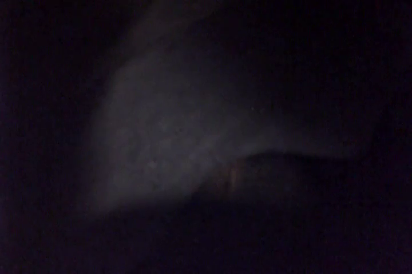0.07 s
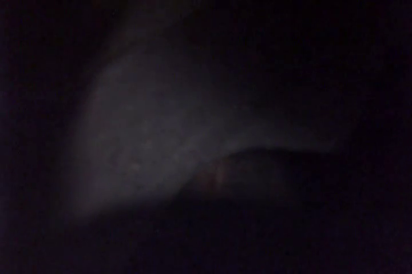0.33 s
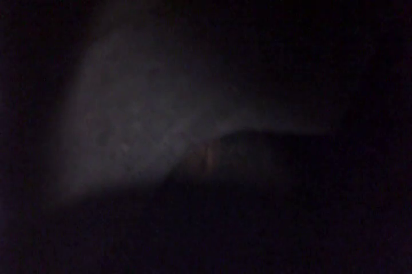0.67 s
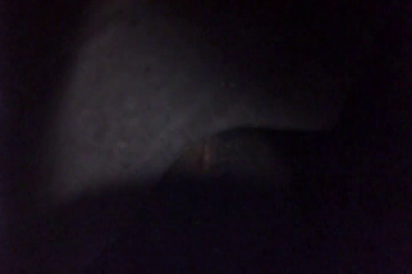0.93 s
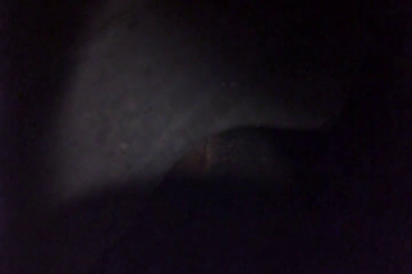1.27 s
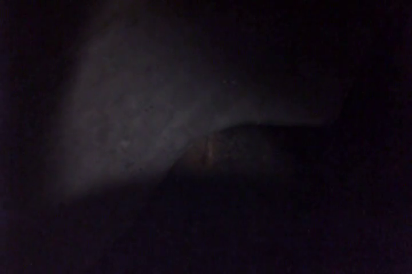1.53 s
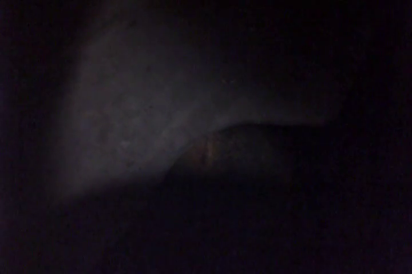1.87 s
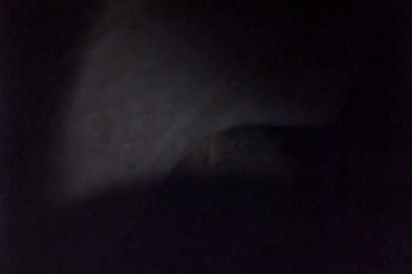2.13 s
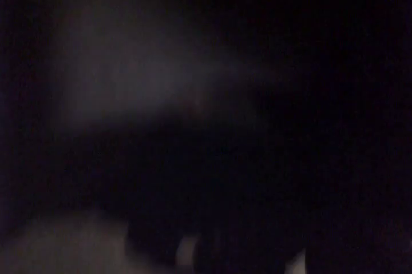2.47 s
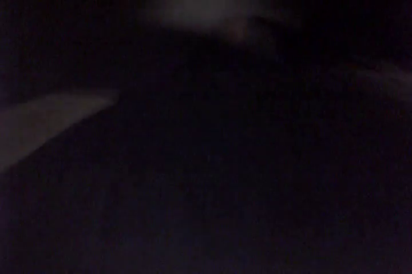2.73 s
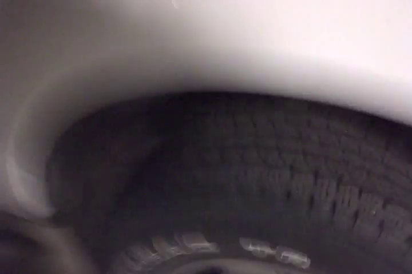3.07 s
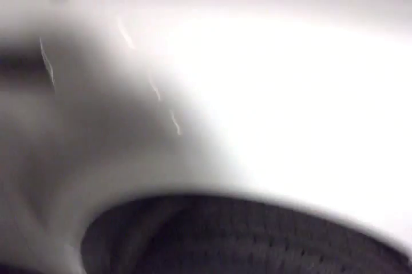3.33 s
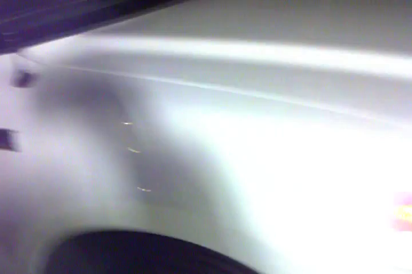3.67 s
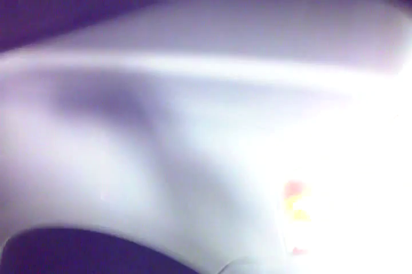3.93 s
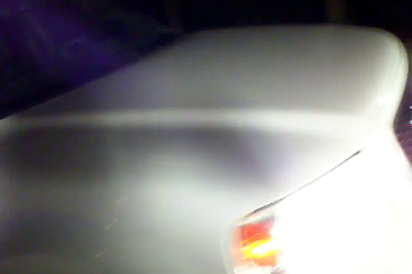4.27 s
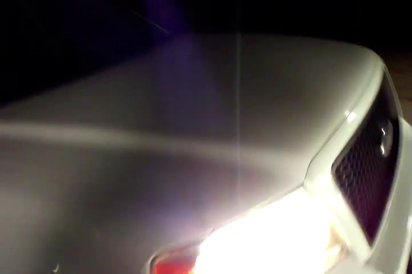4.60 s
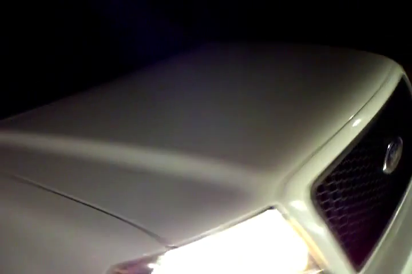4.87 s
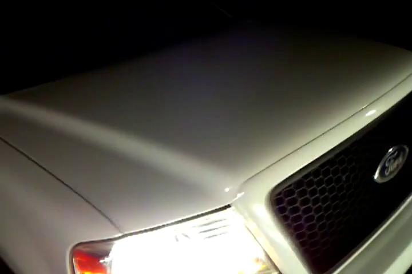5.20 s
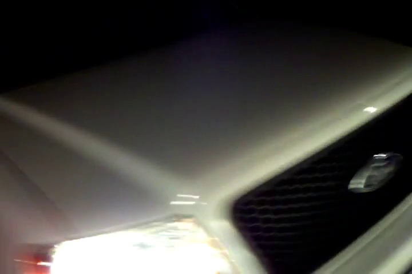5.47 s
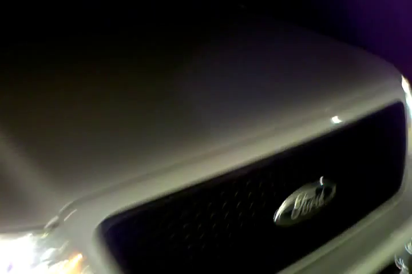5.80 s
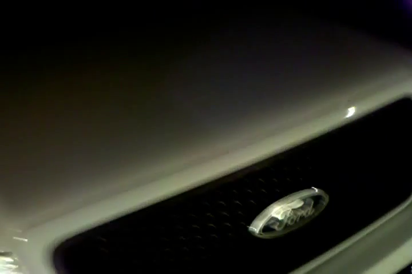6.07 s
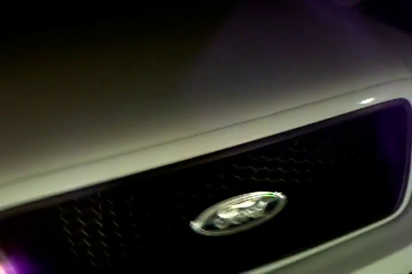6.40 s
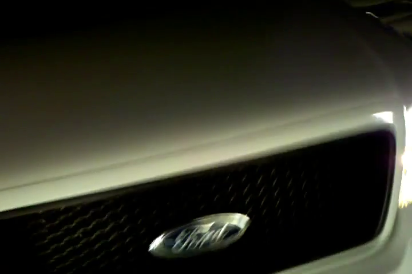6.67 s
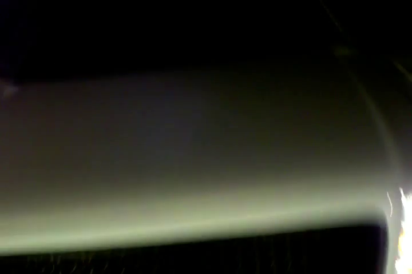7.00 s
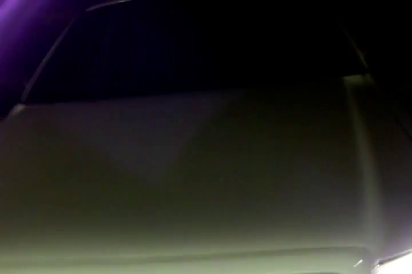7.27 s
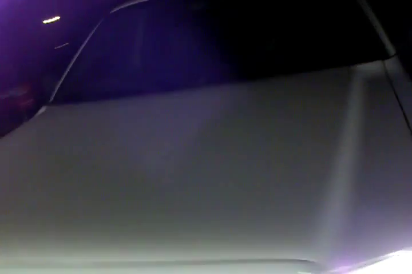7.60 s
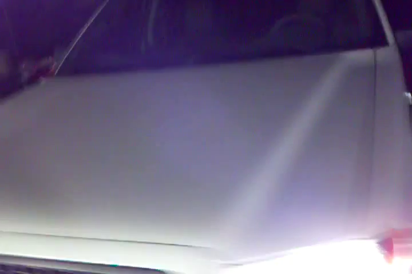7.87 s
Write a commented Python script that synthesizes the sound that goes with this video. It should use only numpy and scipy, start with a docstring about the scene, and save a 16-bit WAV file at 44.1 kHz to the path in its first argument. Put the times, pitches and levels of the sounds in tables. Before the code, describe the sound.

Fast, even ticking from a small exhaust leak, bright and spitting, stands out over the rumble of a truck idling outdoors. The close, hand-held microphone leaves the wheel arch and travels past the fender to the front, so the ticking drops into the background. The engine keeps the same speed throughout, with rough drones, fan hiss and a faint belt pulley whine, its throb slightly fuller at the grille.

```python
"""A V8 truck idles outdoors with an uneven throb throughout, along with an exhaust hum, rough drones, the
rumble of the engine block and the rush of the fan. A small exhaust leak ticks once per engine cycle
(two turns of the crank): now a soft puff, now a hard snap with a second spit. A hand-held microphone
moves from the wheel arch, where the ticks are loudest, along the fender to the grille."""
import sys
import numpy as np
from scipy import signal
from scipy.fft import rfft, irfft
from scipy.io import wavfile

SR = 44100
rng = np.random.default_rng(int(sys.argv[2]) if len(sys.argv) > 2 else 0)


def store_pcm(level_fs):
    """Save levels as 16-bit WAV."""
    pcm = np.round(np.clip(level_fs, -1, 1) * 32767).astype(np.int16)
    wavfile.write(sys.argv[1], SR, np.atleast_2d(pcm).T)


N = 358533
TIME = np.arange(N) / SR
BINS = np.fft.rfftfreq(N, 1 / SR)
CHUG_PHASE, TICK_PHASE = .935, .925  # when in a cycle (0-1) the strongest pulse and the leak come
CHUG_MULTIPLES = (26, 27, 28, 29)  # the throb tones which that pulse makes boom together

# Levels in the tables are relative: the functions scale them further.
# crank speed, wandering a little (time [s], speed [rpm])
CRANK_SPEED = [(0, 803.2), (0.6, 805.7), (1.0, 812.3), (1.3, 809.6), (2.2, 811.9), (2.65, 806.3),
               (3.05, 800.1), (3.5, 807.5), (4.3, 808.4), (4.95, 803.2), (5.6, 810.7), (6.3, 796),
               (6.7, 816.2), (7.2, 802.7), (7.7, 811), (8.13, 809.5)]
# the microphone's path (time [s], place [0 wheel arch, 1 fender, 2 front corner, 3 grille])
WALK = [(2.55, 0), (2.85, 1), (4.5, 1), (4.95, 2), (5.6, 2), (6.05, 3), (7.5, 3)]
# cylinder tones (pitch [times the cycle rate], level at each of the four places [dB])
THROB_TONES = [(19, -44, -49, -55, -47), (23, -50, -48, -51, -46), (26, -48, -50, -49, -41),
               (27, -45.5, -49.5, -45, -37.5), (28, -43.5, -49, -42, -37), (29, -44.5, -67, -57, -52.5),
               (30, -48.5, -62, -59, -51), (32, -47, -54, -40, -42), (33, -41, -41.5, -36.5, -48),
               (35, -47, -42, -34, -48), (37, -50, -49, -52, -41), (42, -44, -56, -48, -54),
               (44, -44, -48, -51, -56), (46, -41.5, -49.5, -57, -71.5), (48, -42, -50.5, -43.5, -53)]
# three exhaust notes that swell and fade (time [s], level at 3, 9 and 12 times the firing rate [dB])
NOTE_LEVELS = [(2.6, -46.5, -51, -55), (2.9, -39, -56, -54), (3.5, -39.5, -60, -52), (4.05, -51, -53, -52),
               (4.5, -38.5, -44, -47), (5.8, -41, -67, -46), (6.05, -46, -38.5, -37.5),
               (6.4, -46, -47, -47), (6.95, -37, -54, -48), (7.2, -37, -36, -46), (7.7, -38, -38.5, -54),
               (7.9, -44, -56, -59)]
# narrow, rough engine drones (pitch [Hz], width [Hz], level at each place [dB])
DRONE_BANDS = [(161.6, 6.5, -47.5, -49, -51, -40), (178, 17, -51, -51, -43, -45),
               (225, 12, -50, -45, -40.5, -49), (323, 18.5, -33.5, -46, -35.5, -52),
               (482, 31, -44.5, -66, -62, -39.5), (647.7, 11.6, -40, -62, -58, -63),
               (891, 16, -44, -58, -63, -68), (1137, 40, -35.5, -52, -56, -55),
               (2158, 14, -47.5, -70, -52, -65)]
# exhaust hum (time [s], level [dB], left minus right [dB])
HUM_LEVELS = [(0, -36, 32), (2.5, -35.5, 30), (3.1, -37, 3), (3.8, -35, -1), (4.5, -38.5, -6),
              (5.1, -40.5, -15), (6.0, -42.5, -2), (7.0, -39, -5), (8.13, -35, -7)]
# whining pulleys (pitch [times the cycle rate], level at each place [dB])
PULLEY_TONES = [(169, -43, -55, -63, -62), (214.6, -43.5, -45.5, -44, -50), (219.5, -48.5, -49.5, -45, -47)]
# engine bay loudness, shielded by the fender and open at the corner (time [s], level [dB])
BAY_LEVEL = [(0, 2), (2.6, 1), (3.2, -4), (3.7, -3.5), (4.4, -1), (5.1, 0.8), (5.9, 1.5), (6.4, -0.7),
             (7.2, -0.6), (8.13, -3.5)]
# the rumble's middle pitches dip beside the fender (time [s], level [dB])
MIDRANGE_LEVEL = [(2.45, -0.8), (2.72, 1), (2.95, -2), (3.3, -4), (4.1, 0), (7.0, -0.5), (8.0, -0.5)]
# loudness of the rumble, the fan's rush and its hiss (level at each place [dB])
RUMBLE_DB = (-30, -32, -31.5, -30.5)
RUSH_DB = (-35, -32.5, -31.5, -32)
HISS_DB = (-33.5, -37.5, -36.3, -34)
# the side the rumble leans to (left minus right at each place [dB])
RUMBLE_PAN_DB = (-7.5, -7.5, -6.5, 2)
# tone colour of the rumble and the rush, in and outside the arch (frequency [Hz], level [dB])
RUMBLE_ARCH = [(20, -43), (60, -28), (88, -12), (125, -8), (200, -6.5), (260, -1), (330, 0.5), (460, 1.5),
               (560, -5.5), (760, -7), (1000, -12.5), (1500, -63)]
RUMBLE_OUTSIDE = [(20, -51), (60, -29), (88, -10.5), (130, -1), (200, -3.5), (300, 5), (370, 0.5), (460, 3),
                  (560, -2), (760, -5), (1000, -15.5), (1500, -65)]
RUSH_ARCH = [(400, -58), (800, 1.5), (1100, 2), (1400, 3), (1650, 0.5), (2000, -4.5), (2500, -3),
             (3100, -9), (4000, -12), (5000, -35)]
RUSH_OUTSIDE = [(400, -20.5), (800, 1), (1100, 0.5), (1400, 2.5), (1650, 0.5), (2000, -3), (2500, -5),
                (3100, -14.5), (4000, -13.5), (5000, -23)]
# tone colour of the fan's hiss and the leak's puff (frequency [Hz], level [dB])
HISS_COLOUR = [(2500, -23), (4000, -4.5), (4900, -3), (6000, -11.5), (7400, -3.5), (8800, -2.5), (9800, -1),
               (10400, 4), (11200, 4.5), (12400, -3.5), (13800, -5)]
PUFF_COLOUR = [(1500, -39), (2500, -3.5), (4600, -4.5), (5300, -1), (6200, -10.5), (8000, 4), (9300, 2),
               (10400, 10.5), (11100, 13), (12500, -6.5), (13300, 8.5), (14000, -28)]
# how alike left and right are (frequency [Hz], likeness [-1 opposite to 1 same])
LIKENESS = [(60, 0), (110, .2), (180, .65), (280, .75), (500, .6), (850, .72), (1450, .99), (1700, .97),
            (2100, .35), (2600, -.25), (3020, -1), (3420, -1), (3900, 0), (4600, .2), (14000, -.05)]
# echoes in the arch reach left and right at different times (frequency [Hz], left's lead [radians])
ARCH_PHASE = [(60, .3), (200, .8), (330, 0), (510, -1.2), (750, 0), (1050, .45), (1500, 0)]
# loudness of the leak's faint ticks (time [s], level [dB])
FAINT_TICK_LEVEL = [(0, -27.5), (3.3, -36), (4.0, -34.5), (5.1, -35), (6.0, -38), (8.13, -37.5)]
# ticks that stand out (time [s], puff [dB], softness [times slower], snap [dB], ping [dB], spit [dB])
LOUD_TICKS = [(0.141, -25.5, 3.7, -36, -34, -38), (0.284, -24.5, 2.6, -24, -35, -33),
              (0.435, -22, 1.1, -28, -25, -26.5), (0.583, -22, 0.8, -18.5, -23, -27.5),
              (0.732, -26, 2.8, -23, -36, -26), (0.880, -23.5, 3.2, -33, -21, -34),
              (1.026, -23.5, 4.1, -32, -37, -30.5), (1.178, -23, 1.1, -28, -27, -27),
              (1.325, -23, 2.9, -27, -36, -30), (1.473, -23, 1.4, -21, -28, -31),
              (1.621, -24.5, 3.3, -31, -36, -35), (1.768, -24, 3.5, -28, -23, -35),
              (1.914, -25, 2.5, -29, -38, -32.5), (2.064, -25.5, 3.3, -33, -37, -37),
              (2.210, -25, 4.5, -26, -27, -34), (2.361, -25, 2.6, -24, -37, -28),
              (2.508, -26, 2.9, -26, -32, -36), (2.657, -30, 1, -23, -34, -33),
              (2.809, -29, 3.2, -27, -36, -38), (2.951, -31.5, 5, -35, -40, -37),
              (3.109, -33, 2.5, -33, -42, -45), (3.704, -34.5, 1.6, -36, -48, -39),
              (4.749, -34, 1.4, -34, -44, -42), (5.639, -34, 1.2, -35, -45, -46)]
# clink of the manifold, the metal pipes that collect the exhaust (pitch [Hz], width [Hz], level [dB])
CLINK_BANDS = [(4960, 600, -3), (7950, 390, 4), (10900, 1100, 5), (13200, 900, 0)]
# the manifold's two clearest tones (pitch [Hz], level [dB])
PING_TONES = [(5100, -8.5), (8140, 1)]
# shifts a wave one way on the left and the other way on the right (left [sign], right [sign])
SIDES = np.array([[1], [-1]])


def gain_of(db):
    """Turns decibels into a number to multiply by."""
    return 10 ** (np.asarray(db) / 20)


def evened(x):
    """Scales a signal to an average strength (rms) of 1."""
    return x / np.sqrt(np.mean(x ** 2) + 1e-20)


def curves(rows):
    """Each column of a time table, at every sample."""
    times, *columns = np.transpose(rows)
    return [np.interp(TIME, times, column) for column in columns]


def spectrum(points):
    """A frequency table, filled in at every frequency."""
    hz, value = np.transpose(points)
    return np.interp(np.log(BINS + 1), np.log(hz + 1), value)


def drift(rate_hz):
    """A random wobble, mostly slower than rate_hz."""
    return evened(irfft(rfft(rng.standard_normal(N)) / (1 + (BINS / rate_hz) ** 4), N))


def panned(db):
    """Left and right gains, db apart, with the same total power."""
    pair = gain_of(np.array([db, -db]) / 2)
    return pair / np.sqrt((pair ** 2).mean(0))


def noise(shape, lead=0):
    """Partly alike left and right noise; shape gives the strength of each frequency."""
    shared, opposed = rfft(rng.standard_normal((2, N)))
    likeness = np.clip(spectrum(LIKENESS), -.998, .998)
    shared, opposed = shared * np.sqrt(1 + likeness), opposed * np.sqrt(1 - likeness)
    pair = np.array([(shared + opposed) * np.exp(1j * lead), shared - opposed])
    return evened(irfft(pair * shape, N))


def coloured(points, lead=0):
    """Noise with the tone colour of a table."""
    return noise(gain_of(spectrum(points)), lead)


def gain_at(levels_db, place):
    """Gain along the walk, from the levels at its four places."""
    return np.interp(place, range(4), gain_of(levels_db))


def walking_noise(arch, outside, place):
    """Noise that changes colour as the microphone leaves the wheel arch."""
    away = np.clip(place, 0, 1)
    return np.sqrt(1 - away) * coloured(arch, spectrum(ARCH_PHASE)) + np.sqrt(away) * coloured(outside)


def cylinder_throb(cycles, place, level_db=-.44, spread_rad=.38):
    """Unequal cylinders make low tones; near the grille a few line up into one chug per cycle."""
    out = np.zeros((2, N))
    for multiple, *levels_db in THROB_TONES:
        offset, side = rng.standard_normal(2)
        disorder = np.interp(place, [1, 3], [1.4, .5]) if multiple in CHUG_MULTIPLES else 1.4
        angle = 2 * np.pi * multiple * (cycles - CHUG_PHASE) + disorder * offset + .15 * drift(2.5)
        out += gain_at(levels_db, place) * np.cos(angle + spread_rad * np.sign(side) * SIDES)
    return np.sqrt(2) * gain_of(level_db) * panned(db=3.5)[:, None] * out


def exhaust_notes(cycles, spread_rad=.25, waver_rad=.28):
    """Higher exhaust notes, on multiples of the eight firings in each cycle."""
    out = np.zeros((2, N))
    for multiple, db in zip((3, 9, 12), curves(NOTE_LEVELS)):
        angle = 2 * np.pi * 8 * multiple * (cycles - CHUG_PHASE)
        out += gain_of(db) * np.cos(angle + waver_rad * drift(2.7) + spread_rad * SIDES)
    return np.sqrt(2) * panned(db=2)[:, None] * out


def engine_drones(cycles, place, level_db=-1, shake=.34):
    """Rough drones, mostly at multiples of the firing rate, shaken by the uneven running."""
    lurch = 1 - shake * np.cos(2 * np.pi * 3 * cycles)
    out = np.zeros((2, N))
    for hz, width, *levels_db in DRONE_BANDS:
        peak = 1 / (1 + ((BINS - hz) / (.97 * width)) ** 2)
        out += gain_at(levels_db, place) * noise(peak)
    return gain_of(level_db) * lurch * out


def exhaust_hum(cycles, level_db=-4, spread_rad=.54):
    """The steady exhaust note: two waves for each of the eight firings."""
    db, pan_db = curves(HUM_LEVELS)
    wave = np.cos(2 * np.pi * 16 * cycles + spread_rad * SIDES) / np.cos(spread_rad)
    return np.sqrt(2) * gain_of(db + level_db) * panned(pan_db) * wave


def pulley_whine(cycles, place, waver_rad=.98, flutter_db=2.5):
    """Belt-driven pulleys whine at pitches that follow the engine's speed."""
    out = np.zeros(N)
    for ratio, *levels_db in PULLEY_TONES:
        angle = 2 * np.pi * ratio * cycles + waver_rad * drift(7.4)
        out += gain_at(levels_db, place) * gain_of(flutter_db * drift(8.9)) * np.cos(angle)
    return np.sqrt(2) * out


def block_rumble(place, bay_db, middle_hz=470, width_hz=170):
    """Burning fuel rumbles through the block and panels; the fender dims the middle pitches."""
    level = gain_at(RUMBLE_DB, place) * gain_of(.66 * bay_db)
    balance = panned(np.interp(place, range(4), RUMBLE_PAN_DB))
    body = walking_noise(RUMBLE_ARCH, RUMBLE_OUTSIDE, place)
    middle = irfft(rfft(body) / (1 + ((BINS - middle_hz) / width_hz) ** 4), N)
    middle_db, = curves(MIDRANGE_LEVEL)
    return level * balance * (body + (gain_of(middle_db) - 1) * middle)


def fan(cycles, place, bay_db, chop=.025, flutter_db=.9):
    """Air rushes through the fan and radiator, lightly chopped by the blades, with a fine hiss on top."""
    blades = 1 + chop * np.cos(2 * np.pi * 24 * cycles)
    rush_gain = gain_at(RUSH_DB, place) * gain_of(1.31 * bay_db) * blades
    hiss_gain = gain_at(HISS_DB, place) * gain_of(bay_db + flutter_db * drift(20))
    return rush_gain * walking_noise(RUSH_ARCH, RUSH_OUTSIDE, place) + hiss_gain * coloured(HISS_COLOUR)


def faint_ticks(cycles, vary_db=.6, softness=2, snap_db=-3, spit_db=-10):
    """Rows like LOUD_TICKS for all other cycles, where the leak ticks softly with no ping."""
    due = np.arange(-1, int(cycles[-1] - TICK_PHASE) + 1) + TICK_PHASE
    times = np.interp(due, cycles, TIME)
    times += np.minimum(due, 0) * TIME[-1] / cycles[-1]  # the first falls just before the start
    puff_db = np.interp(times, *np.transpose(FAINT_TICK_LEVEL)) + vary_db * rng.standard_normal(len(due))
    loud_times = np.transpose(LOUD_TICKS)[0]
    return [(s, db, softness, db + snap_db, None, db + spit_db)
            for s, db in zip(times, puff_db) if min(abs(loud_times - s)) > .05]


def burst(t, rise_s, fall_s, hold_s=0):
    """A loudness shape that swells up to t = 0, holds, and dies away."""
    return np.exp(-np.maximum(np.maximum(-t / rise_s, (t - hold_s) / fall_s), 0))


def exhaust_leak(ticks, open_s=.009, spit_delay_s=.027, tail_db=-10, sputter_db=1.5):
    """A gap snaps open, gas sputters out and rings round the engine bay; a second spit follows."""
    crack, puff = np.zeros((2, N))
    for s, puff_db, softness, snap_db, _, spit_db in ticks:
        near = slice(max(round((s - .05) * SR), 0), round((s + .14) * SR))
        t = TIME[near] - s
        snap = gain_of(snap_db) * burst(t, rise_s=.0005, fall_s=.005)
        spit = gain_of(spit_db) * burst(t - spit_delay_s, rise_s=.0025, fall_s=.011)
        jet = burst(t, rise_s=.0018 * softness, fall_s=.0042 * softness, hold_s=open_s)
        tail = gain_of(tail_db) * burst(t - open_s, rise_s=.018, fall_s=.04)
        crack[near] += np.hypot(snap, spit)
        puff[near] += gain_of(puff_db) * np.hypot(jet, tail)
    sputter = gain_of(sputter_db * drift(220))
    return sputter * (crack * manifold_clink() + puff * coloured(PUFF_COLOUR))


def manifold_clink():
    """Swirling gas rings the manifold at its own pitches."""
    power = sum(gain_of(db) ** 2 / (1 + (2 * (BINS - hz) / width) ** 2) for hz, width, db in CLINK_BANDS)
    return noise(np.sqrt(power))


def manifold_pings(ticks, detune=.012):
    """A hard tick sets the manifold pinging, a little differently each time."""
    out = np.zeros((2, N))
    for s, *_, ping_db, _ in ticks:
        near = abs(TIME - s) < .04
        t = TIME[near] - s
        shape = burst(t, rise_s=.00063, fall_s=.004)
        for hz, db in PING_TONES:
            turns = hz * (1 + detune * rng.standard_normal()) * t + rng.random((2, 1)) / 2
            out[:, near] += gain_of(ping_db + db) * shape * np.sin(2 * np.pi * turns)
    return np.sqrt(2) * out


def grille_chug(cycles, place, depth=.12):
    """Towards the grille the tones swell once in every cycle."""
    return 1 + depth * np.clip(place - 2, 0, 1) * np.cos(2 * np.pi * (cycles - CHUG_PHASE))


def scene():
    """Adds up the sounds as the crank turns and the microphone moves."""
    rpm, = curves(CRANK_SPEED)
    cycles = np.cumsum(rpm) / SR / 120  # 60 seconds a minute, two turns a cycle
    place, = curves(WALK)
    bay_db, = curves(BAY_LEVEL)
    tones = cylinder_throb(cycles, place) + exhaust_notes(cycles) + engine_drones(cycles, place)
    engine = grille_chug(cycles, place) * tones + exhaust_hum(cycles) + pulley_whine(cycles, place)
    engine += block_rumble(place, bay_db) + fan(cycles, place, bay_db)
    return engine + exhaust_leak(LOUD_TICKS + faint_ticks(cycles)) + manifold_pings(LOUD_TICKS)


def record(dry):
    """Cuts away the highest treble, above 14000 Hz."""
    low_pass = signal.firwin(511, 14000, window=("kaiser", 9), fs=SR)
    return signal.oaconvolve(dry, low_pass[None], "same")


dry = scene()
out = record(dry)
store_pcm(out)
```